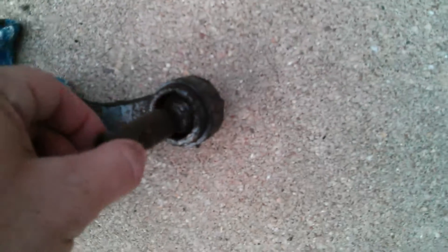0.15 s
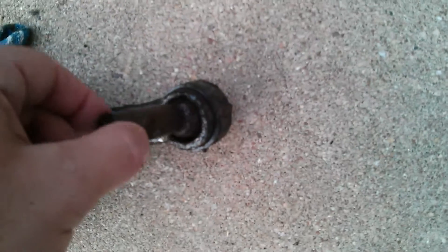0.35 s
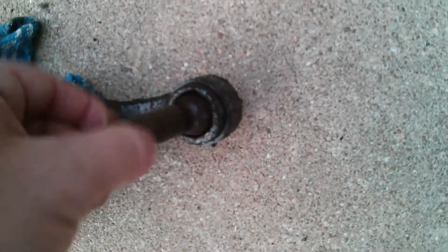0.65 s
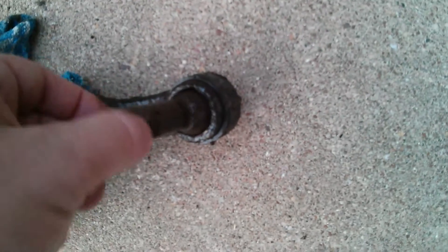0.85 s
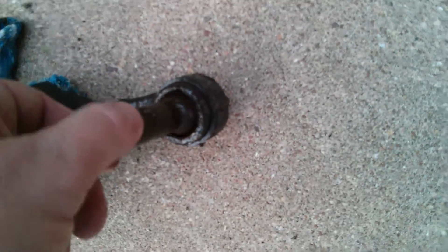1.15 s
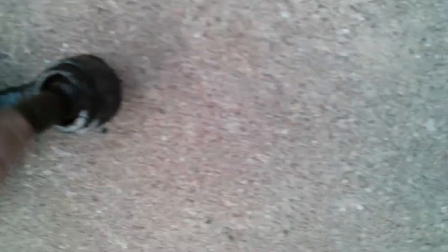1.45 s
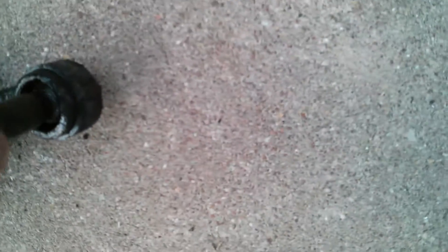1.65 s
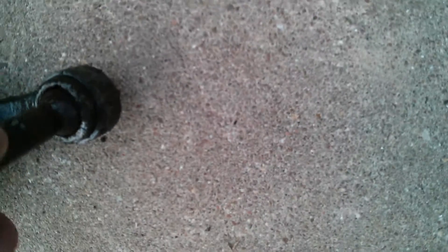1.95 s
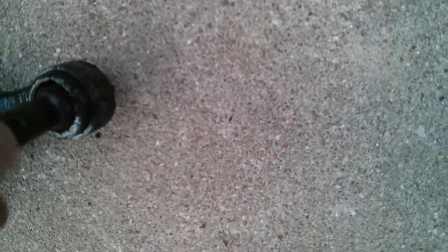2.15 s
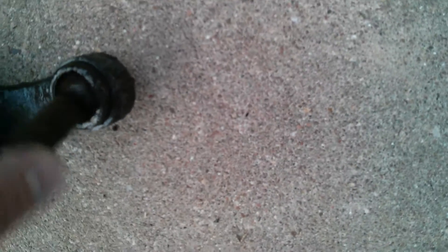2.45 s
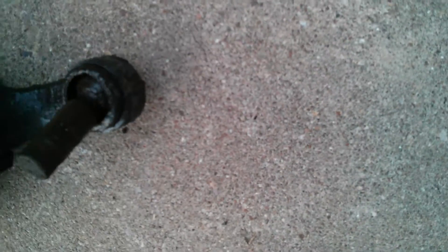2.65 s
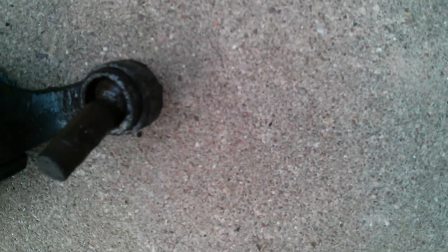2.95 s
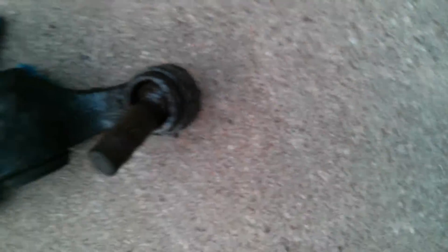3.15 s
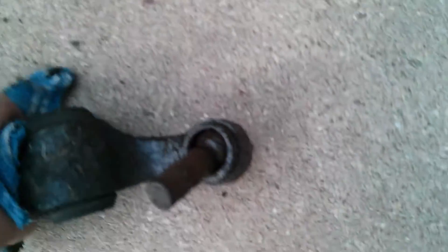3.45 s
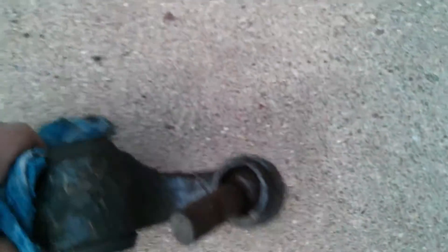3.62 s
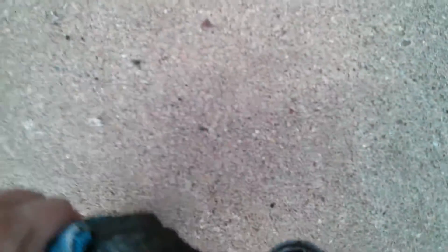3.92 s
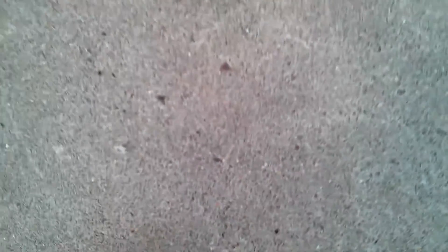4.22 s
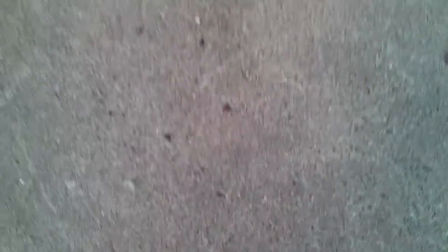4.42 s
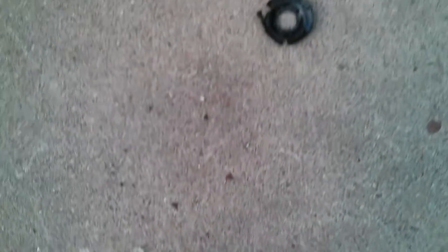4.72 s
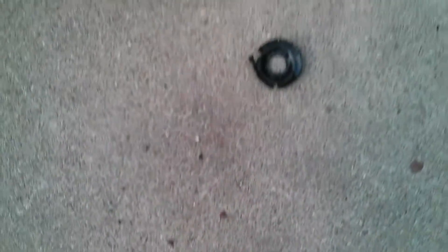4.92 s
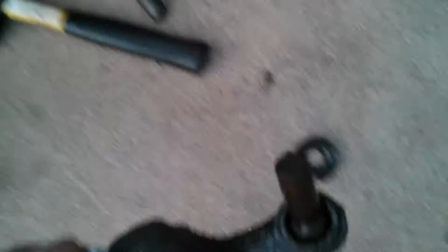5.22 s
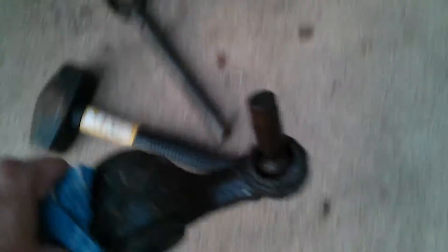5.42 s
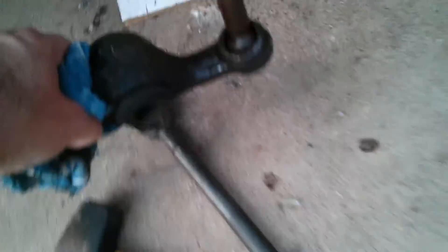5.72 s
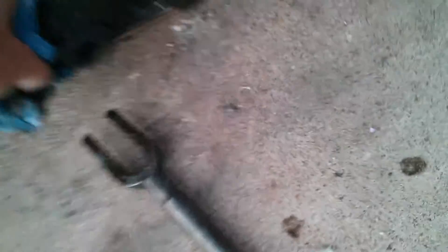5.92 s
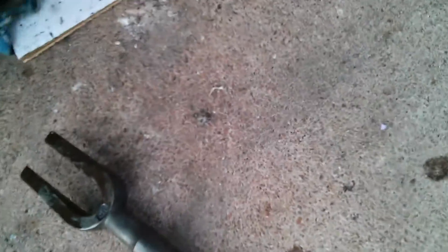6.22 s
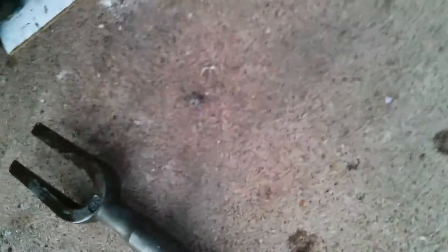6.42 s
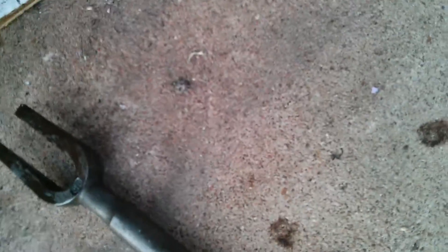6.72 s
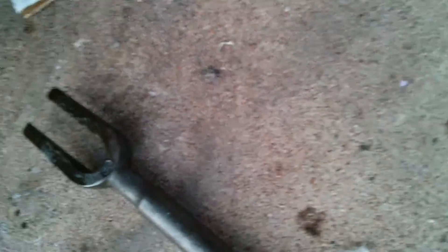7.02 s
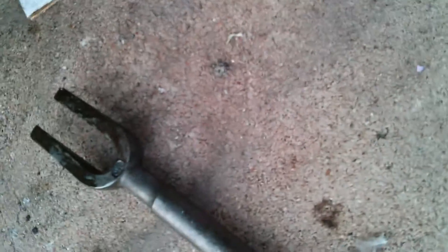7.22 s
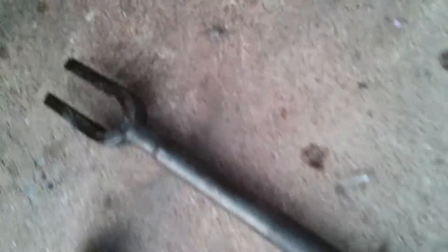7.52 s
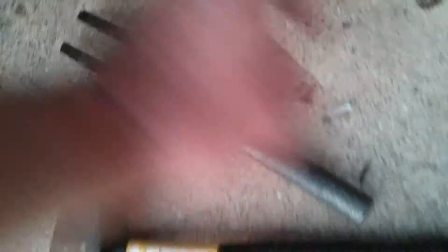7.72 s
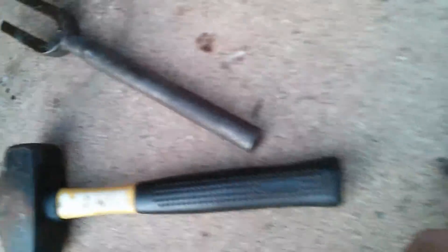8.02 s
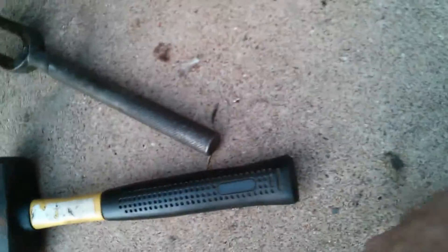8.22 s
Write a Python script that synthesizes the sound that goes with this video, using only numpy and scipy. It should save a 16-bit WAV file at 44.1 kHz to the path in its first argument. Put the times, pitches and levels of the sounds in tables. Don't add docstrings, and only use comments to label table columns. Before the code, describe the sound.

Close, dry clinks of a loose steel stud knocked in its worn socket, with tiny faint squeaks between. After a quiet gap, the iron arm scuffs gritty concrete and brushes a steel fork, which rings briefly. Two clusters of hard clanks follow as it bangs down among tools, then light taps. Distant traffic, thin far tones and leaf hiss run throughout; a bird rasps faintly twice. Handheld microphone, short dull echo.

```python
import sys
import numpy as np
from scipy import signal
from scipy.fft import rfft, irfft, next_fast_len
from scipy.io import wavfile

SR = 44100
rng = np.random.default_rng(int(sys.argv[2]) if len(sys.argv) > 2 else 0)


def decibels_to_gain(level_db):
    exponent = np.asarray(level_db, float) / 20
    return 10 ** exponent


def persist_wave(psi):
    counts = np.round(np.clip(psi, -1, 1) * 32767).astype(np.int16)
    wavfile.write(sys.argv[1], SR, np.atleast_2d(counts).T)


N = 368676
TIME = np.arange(N) / SR


def rms_one(x):
    return x / np.sqrt(np.mean(x ** 2) + 1e-20)


def in_time(rows):
    s, *columns = np.transpose(rows)
    return [np.interp(TIME, s, column) for column in columns]


def band(x, low_hz, high_hz, order=2):
    edges = [low_hz, min(high_hz, .45 * SR)]
    return signal.sosfilt(signal.butter(order, edges, "band", fs=SR, output="sos"), x)


def coloured(x, spectrum):
    hz, level_db = np.transpose(spectrum)
    size = next_fast_len(len(x), True)
    grid_hz = np.arange(1, size // 2 + 2) * SR / size
    gain = decibels_to_gain(np.interp(np.log(grid_hz), np.log(hz), level_db, -90, -90))
    return rms_one(irfft(rfft(x, size) * gain, size)[:len(x)])


def drift(rate_hz, size=N):
    r = np.exp(-80 * np.pi * rate_hz / SR)
    slow = signal.lfilter([1], [1, -2 * r, r * r], rng.standard_normal(size // 40 + 502))[500:]
    slow = (slow - slow.mean()) / slow.std()
    return np.interp(np.arange(size) / 40, np.arange(len(slow)), slow)


def resonances(x, modes):
    out = 0
    for k, (hz, width_hz, level_db) in enumerate(modes):
        r = np.exp(-np.pi * width_hz / SR)
        feed = np.array([1, 0, -1]) * (1 - r * r) / 2
        back = [1, -2 * r * np.cos(2 * np.pi * hz / SR), r * r]
        out = out + (-1) ** k * decibels_to_gain(level_db) * signal.lfilter(feed, back, x)
    return out


def grains(per_s, spread_db):
    sizes = decibels_to_gain(spread_db * np.minimum(rng.exponential(1, N), 4)) * rng.choice([-1, 1], N)
    return rms_one(sizes * (rng.random(N) < per_s / SR) + 1e-9)


def add(out, s, sound):
    i = round(s * SR)
    out[i:i + len(sound)] += sound[:N - i]


def struck(t, hz, level_db, t60, rise):
    return decibels_to_gain(level_db - 60 * t / t60) * (1 - np.exp(-t / rise)) * np.sin(2 * np.pi * hz * t)


def presses(rows, fade_db_s, extra_db=None, lift_db=0):
    out = np.zeros(N)
    for k, (start, length, final_db, swell_db, *_) in enumerate(rows):
        i = int(start * SR)
        t = TIME[:min(SR, N - i)]
        level_db = final_db - swell_db * np.maximum(1 - t / max(length, 1e-3), 0)
        level_db = level_db - fade_db_s * np.maximum(t - length, 0)
        level_db = level_db - lift_db * np.clip((t - length) / 0.0038, 0, 1)
        out[i:i + SR] += np.minimum(t / 0.0064, 1) * decibels_to_gain(level_db + (extra_db[k] if extra_db else 0))
    return out


# (time [s], heavy traffic level [dB], tyre whine level [dB])
ROAD_LEVELS = [(0.0, -51, -50.5), (.46, -50, -49), (1.21, -47.5, -50.5), (1.91, -49, -51.5),
               (2.33, -47.5, -48.5), (3.26, -55.5, -51.5), (4.15, -50.5, -54), (5.42, -58.5, -55),
               (6.03, -57, -57), (6.3, -51, -52.5), (7.03, -52, -59.5), (7.42, -48, -55.5),
               (7.71, -52, -58.5), (8.36, -50.5, -55.5)]
# (frequency [Hz], level [dB])
RUMBLE_SPECTRUM = [(65, -43), (110, -11), (166, 2.5), (275, 0.5), (330, -7), (430, -7.5), (730, -120)]


def road():
    rumble_db, whine_db = in_time(ROAD_LEVELS)
    roar_db = -54 + 0.39 * (rumble_db - rumble_db.mean())
    white = rng.standard_normal((4, N))
    wind = decibels_to_gain(-54 + 2.2 * drift(6.1)) * rms_one(band(white[3], 31, 116))
    rumble = decibels_to_gain(rumble_db + 1.0 + 1.73 * drift(24.0)) * coloured(white[0], RUMBLE_SPECTRUM)
    roar = decibels_to_gain(roar_db + 1.8 * drift(20.0)) * rms_one(band(white[1], 284, 600))
    tyre_modes = [(930, 15.0, 4.5), (810, 113, -5.5), (1032, 110, -2.0), (743, 105, -3.0)]   # Hz, width, dB
    whine = rms_one(resonances(white[2], tyre_modes))
    return wind + rumble + roar + decibels_to_gain(whine_db - 2.14 + 2.7 * drift(5.9)) * whine


# (time [s], hedge level [dB], treetop level [dB])
BREEZE_LEVELS = [(0.0, -47.5, -56), (0.3, -50.5, -54), (2.0, -46, -50), (2.98, -48.5, -54),
                 (3.33, -49.5, -55), (3.91, -47.5, -52), (4.56, -45, -50), (4.84, -48.5, -57.5),
                 (5.1, -46, -55), (5.35, -40.5, -50.5), (6.12, -50.5, -58), (6.36, -46.5, -54),
                 (6.52, -42.5, -50), (6.89, -47.5, -55.5), (7.24, -50, -55), (7.38, -40.5, -50),
                 (7.68, -45, -54.5), (8.36, -49, -60)]
# (frequency [Hz], level [dB])
HEDGE_SPECTRUM = [(2650, -22.5), (4500, -11.5), (4900, -7), (6430, -1.5), (7170, 2.5), (8380, 2.5),
                  (9500, -9.5), (12400, -25), (20900, -120)]
TREETOP_SPECTRUM = [(5590, -19), (9500, -3.5), (10200, -7), (11200, -5.5), (14200, -12), (15900, -10)]
AIR_SPECTRUM = [(900, 1), (1100, 0.5), (1850, -7), (2200, -9), (2700, -18), (3150, -42), (3600, -13),
                (4300, -21), (5000, -44), (6000, -31)]
# (lowest frequency [Hz], highest frequency [Hz])
BUSH_BANDS = [(4000, 5600), (5600, 7000), (7000, 8600), (8600, 10500), (10500, 13500)]


def leaves():
    hedge_db, top_db = in_time(BREEZE_LEVELS)
    tyre_db = in_time(ROAD_LEVELS)[1]
    air_db = -60 + 0.73 * (tyre_db - tyre_db.mean())
    white = rng.standard_normal((3, N))
    hedge = decibels_to_gain(hedge_db - 1) * coloured(white[0], HEDGE_SPECTRUM)
    hiss = hedge + decibels_to_gain(top_db + 3) * coloured(white[1], TREETOP_SPECTRUM)
    for low_hz, high_hz in BUSH_BANDS:
        hiss = hiss + (decibels_to_gain(1.5 * drift(4.5)) - 1) * band(hiss, low_hz, high_hz)
    gusts = decibels_to_gain(-1.32 + 0.97 * drift(12) + 1.6 * drift(0.43))
    return gusts * hiss + decibels_to_gain(air_db + 1.6 * drift(4.3)) * coloured(white[2], AIR_SPECTRUM)


# (start time [s], end time [s], start frequency [Hz], end frequency [Hz], level [dB])
FAR_TONES = [(0.255, 0.758, 927, 930, -55.5), (0.691, 0.911, 242, 264, -47.5), (0.86, 1.054, 326, 553, -48),
             (1.026, 1.146, 372, 350, -52.5), (1.05, 1.674, 461, 456.4, -53.5),
             (1.252, 1.6, 252.3, 250, -53.5), (2.101, 2.65, 920, 957, -56.5),
             (2.697, 3.15, 930, 930, -60.5), (4.101, 4.26, 532, 507, -57.5),
             (4.207, 4.368, 412.5, 403, -51.5), (4.589, 4.79, 326, 328, -57),
             (4.948, 5.655, 973, 1028, -62), (7.716, 8.402, 356, 353.5, -56),
             (7.721, 8.396, 418, 427, -55.5), (7.9, 8.403, 197, 168.7, -55), (0, 0.142, 3570, 3750, -63),
             (0.315, .41, 3700, 3720, -63), (1.277, 1.468, 3720, 3720, -73)]


def drones():
    out, t = np.zeros(N), TIME[:SR]
    for start, end, from_hz, to_hz, db in FAR_TONES:
        hz = np.interp(t, [0, end - start], [from_hz, to_hz]) * (1 + 0.0059 * drift(8.9, size=SR))
        swell = np.clip(np.minimum(t, end - start - t) / 0.032, 0, 1)
        waver = 0.33 + drift(8 + to_hz / 60, size=SR)
        add(out, start, swell * decibels_to_gain(db + 6.5) * waver * np.sin(2 * np.pi * np.cumsum(hz) / SR))
    return out


# (start time [s], length [s], level [dB])
BIRD_CALLS = [
    (6.57, .16, -50),
    (8.07, .26, -52),
]
# (frequency [Hz], level [dB])
BIRD_LINES = [(3560, -6), (3740, -6), (4020, 0), (4360, -4), (4710, -3), (5120, -5), (5450, -5), (5670, -2),
              (5890, -6)]


def bird():
    out, t = np.zeros(N), TIME[:SR // 3]
    from_hz, to_hz, width_hz = 5700, 4050, 620
    for start, length, db in BIRD_CALLS:
        slide = 1 / (1 + np.exp((t / length - .38) / .07))
        stress_hz = to_hz + (from_hz - to_hz) * slide
        swell = np.clip(np.minimum(t, length + .02 - t) / 0.045, 0, 1)
        swell = swell * decibels_to_gain(db + 2.5 * drift(33, size=len(t)))
        breath = rms_one(band(rng.standard_normal((len(BIRD_LINES), len(t))), 6, 60))
        for (hz, line_db), noise in zip(BIRD_LINES, breath):
            stress = np.exp(-((hz - stress_hz) / width_hz) ** 2)
            add(out, start, swell * decibels_to_gain(line_db) * stress * noise * np.sin(2 * np.pi * hz * t))
    return out


def walls(x):
    t = TIME[:SR // 3]
    fade = decibels_to_gain(-47 - 60 * t / 0.41) * (t > .006)
    response = fade * rng.standard_normal(len(t))
    return signal.fftconvolve(band(x, 280, 10600, order=1), response)[:N]


# (time [s], peak level [dB], low modes level [dB])
TOOL_TAPS = [
    (6.536, -13, -9),
    (6.549, -2, -20),
]
# (frequency [Hz], level [dB], time to fall 60 dB [s])
TOOL_MODES = [(1810, -7, 0.054), (2480, -17, 0.12), (3050, -22, 0.088), (4500, -34, 0.07),
              (5120, -43, 0.31), (5660, -2.5, 0.03), (6200, -10, 0.03), (6360, -16, 0.025),
              (7483, -34, 5.0)]


def small_tool():
    out, t = np.zeros(N), TIME[:SR // 8]
    rattle = band(rng.standard_normal((len(TOOL_TAPS), len(t))) * decibels_to_gain(-60 * t / 0.1), 1400, 4600)
    for (s, peak_db, low_db), noise in zip(TOOL_TAPS, rattle):
        add(out, s, decibels_to_gain(peak_db - 22) * noise)
        for hz, db, t60 in TOOL_MODES:
            favour_db = (low_db + 10.5 + 5 * (hz > 2000)) * (hz < 3500)
            add(out, s, struck(t, hz, peak_db + db - 7.0 + favour_db, min(t60, .045), 0.00057))
    return out


# (start time [s], length [s], final level [dB], swell [dB])
FORK_GRAZES = [
    (5.672, 0.025, -19, 0),
    (5.695, 0.017, -3.5, 9),
    (5.71, 0.023, -7, -4),
    (5.731, 0.0086, -15, -7),
]
# (first level [dB], second level [dB], third level [dB], fourth level [dB])
GRAZE_REACH = [(-20, -12, -14, -27), (-18.5, -12, -2.5, -12), (-20, -4.5, -12, -23), (-22, -11, -6, -18)]
# (frequency [Hz], level [dB])
FORK_MODES = [
    [(3022, 2)],
    [(5305, -1.5), (5413, -14), (4655, -16.5), (14120, -14)],
    [(5976, -2), (6126, -14), (6464, -17), (6840, -20)],
    [(9850, -2), (11100, -5), (9100, -9), (13000, -11)],
]


def fork():
    out, start = np.zeros(N), round(FORK_GRAZES[0][0] * SR)
    span, size = slice(start, start + SR // 4), SR // 4
    for modes, reach_db in zip(FORK_MODES, zip(*GRAZE_REACH)):
        rubbing = presses(FORK_GRAZES, 620, reach_db, 13)
        tail = decibels_to_gain(-38) * presses(FORK_GRAZES, 520, reach_db)
        drive = rubbing + tail
        for hz, db in modes:
            ring = np.sin(2 * np.pi * hz * TIME[span] + 1.1 * drift(70, size=size))
            out[span] += drive[span] * decibels_to_gain(db + 1.5 + 1.6 * drift(140, size=size)) * ring
    return out


# (start time [s], length [s], frequency [Hz], level [dB]); close pairs beat
STUD_SPOTS = [(0.2776, 0.0067, 2430, -8.5), (0.278, 0.0071, 2640, -18), (0.2772, .003, 12400, -32),
              (0.277, .001, 5070, -32.5), (0.28, 0.0015, 7530, -17), (0.281, .008, 3500, -43),
              (0.3022, 0.001, 7870, -19.5), (0.303, 0.013, 3690, -34), (0.313, 0.011, 4050, -41),
              (0.31, 0.0082, 3030, -41), (1.546, .002, 7800, -32), (1.5466, .008, 2467, -22.5),
              (1.5468, .008, 2645, -22.5), (2.4, 0.0036, 5800, -47), (2.4395, 0.0022, 4470, -18.5),
              (2.44, 0.0048, 4060, -21.5), (2.447, 0.012, 6250, -41), (2.581, .002, 12600, -38),
              (2.438, 0.0053, 3130, -25), (2.57, 0.014, 5670, -44), (2.571, 0.0065, 3200, -42),
              (2.564, 0.029, 1820, -45)]
# (start time [s], length [s], frequency [Hz], level [dB])
ARM_SPOTS = [(5.128, .05, 1940, -50), (5.208, 0.016, 2940, -40), (5.343, .02, 1936, -39),
             (5.6715, 0.0018, 5260, -24), (6.349, 0.011, 4920, -13.5), (6.35, 0.0088, 5850, -12),
             (6.351, .007, 8540, -19), (6.351, .01, 3770, -22), (6.385, .006, 7910, -27),
             (6.384, .006, 10800, -24), (6.386, .012, 12600, -27), (6.407, 0.014, 6200, -26),
             (6.422, 0.0068, 6200, -26), (6.407, .014, 5050, -32), (6.408, 0.0096, 3680, -24),
             (6.421, .005, 3500, -25), (6.409, 0.006, 2410, -24), (6.45, .006, 6600, -22),
             (6.453, 0.012, 3980, -30), (6.541, 0.0057, 3300, -33), (6.558, 0.0093, 2540, -30),
             (6.555, .008, 4450, -41), (7.207, 0.0064, 1016, -22.5), (7.216, .01, 5660, -24),
             (7.24, 0.024, 1210, -19), (7.241, 0.022, 800, -20), (7.245, 0.018, 388, -25),
             (7.24, 0.069, 106, -29), (7.24, 0.045, 183, -28), (7.253, 0.0064, 7160, -15),
             (7.255, .01, 4370, -21), (7.253, .008, 6200, -19), (7.284, 0.008, 4590, -31),
             (7.288, .003, 5700, -22), (7.305, 0.025, 3630, -35), (7.31, .02, 5720, -43),
             (7.389, .003, 6740, -28), (7.391, 0.009, 4760, -23), (7.391, 0.014, 3030, -25),
             (7.395, 0.0027, 1370, -21), (7.312, .02, 1110, -33), (7.398, 0.0065, 2390, -31),
             (7.555, 0.0071, 2230, -46.5), (7.883, 0.0044, 2070, -59), (7.953, 0.002, 7700, -27)]


def rings():
    out, t = np.zeros(N), TIME[:SR // 10]
    sag_db_s, fade_db_s, rise_s = 250, 2597, 0.0008
    for start, length, hz, db in STUD_SPOTS + ARM_SPOTS:
        loss_db = sag_db_s * t + fade_db_s * np.maximum(t - length, 0)
        wobble_db = 1.4 * drift(100, size=len(t))
        level = decibels_to_gain(db - loss_db + wobble_db) * (1 - np.exp(-t / rise_s))
        add(out, start, level * np.sin(2 * np.pi * hz * t))
    return out


# (time [s], frequency [Hz], level [dB])
EDGE_SNAPS = [(5.171, 7600, -26), (5.184, 7000, -27), (5.2005, 7500, -18), (5.3538, 5870, -10),
              (5.6722, 830, -29), (5.8119, 663, -22.5), (5.817, 900, -27), (6.3556, 5440, -9),
              (6.4476, 6660, -3), (6.4518, 5900, -4), (6.5495, 6400, -14), (7.2125, 11300, -2),
              (7.218, 5600, -6), (7.2545, 6500, -1), (7.3898, 6500, -4)]


def snaps():
    out, t = np.zeros(N), TIME[:SR // 20]
    for s, hz, db in EDGE_SNAPS:
        add(out, s, struck(t, hz, db + 3.0, 16.0 / hz, 0.00012))
    return out


# (time [s], peak level [dB], top level [dB], thud level [dB])
SHARP_BLOWS = [(1.326, -53.5, -48, -59), (1.638, -74, -42, -43), (2.287, -61, -30, -42),
               (2.4385, -43, -29.5, -50), (5.354, -13, -32, -43), (5.473, -23, -32, -47),
               (5.6733, -15, -28, -18), (5.812, -22, -43, -19), (6.349, 2, 5.5, -12), (6.3547, 4, -3, -13),
               (6.3847, -23, -12, -22), (6.406, -9, -26, -39), (6.43, -26, -26, -40),
               (6.4346, -18, -11, -27), (6.443, -32, -18, -40), (6.448, -22, -10, -31),
               (6.4517, -11, -6, -30), (7.196, -15, -33, -19.5), (7.2032, -35, -20, -32),
               (7.208, -13, -11, -18), (7.2123, -20, -6, -39), (7.2176, -3, -14, -42),
               (7.2243, -24, -16, -42), (7.229, -22, -22, -44), (7.2377, -7, -31, -18),
               (7.25, -20, -19, -30), (7.252, -14, -2, -15), (7.262, -8, -5, -23), (7.306, -26, -15, -33),
               (7.3136, -18, -11.5, -21), (7.3826, -32, -12, -23), (7.3915, 2.5, -35, -19.5),
               (7.5564, -19.5, -37, -45), (7.639, -26, -36, -45), (7.886, -26.5, -30.5, -46),
               (7.954, -37, -35, -49)]
# (frequency [Hz], width [Hz], level [dB])
ARM_MODES = [(348, 21, -2), (800, 164, 5), (1130, 380, -1), (1635, 250, 4.5), (2160, 410, -4.5),
             (2650, 26, -37), (3040, 31, -39), (3220, 76, -1), (3980, 99, -24), (3900, 100, -22)]


def blows():
    out, t = np.zeros(N), TIME[:SR // 8]
    white = rng.standard_normal((len(SHARP_BLOWS), 3, len(t)))
    crack = 9.1 * (np.arange(len(t)) == 4)
    rise = 1 - np.exp(-t / 0.0006)
    for (s, peak_db, top_db, thud_db), noise in zip(SHARP_BLOWS, white):
        spray = noise[0] * rise * decibels_to_gain(-60 * t / 0.06) + crack
        top = noise[1] * rise * decibels_to_gain(-60 * t / 0.025) + crack
        thud = resonances(noise[2] * decibels_to_gain(-60 * t / 0.04), ARM_MODES)
        thud = thud + decibels_to_gain(-9.0) * noise[2] * decibels_to_gain(-60 * t / 0.01) + decibels_to_gain(-2.5) * crack
        add(out, s, decibels_to_gain(peak_db - 12.5) * band(spray, 3160, 7800))
        add(out, s, decibels_to_gain(top_db - 2.5) * band(top, 9400, 17750))
        add(out, s, decibels_to_gain(thud_db + 7.5) * band(thud, 300, 1940))
    return out


# (start time [s], length [s], final level [dB], swell [dB])
GRIT_DRAGS = [(5.11, 0.073, -34.5, 12), (5.19, 0.033, -32, 11), (5.337, 0.014, -30, 6),
              (5.365, 0.15, -53, -13), (5.471, 0.013, -28.5, -4), (5.671, 0.025, -27, 17),
              (5.698, 0.035, -18.5, 1), (5.8, 0.3, -61.5, -20), (5.801, 0.008, -30, 0),
              (6.343, 0.0091, -8.5, 32), (6.37, 0.035, -32, 14), (6.405, 0.045, -21.5, 15),
              (6.452, 0.0049, -42, -16), (7.196, 0.02, -18.5, 24), (7.222, 0.014, -29, -5),
              (7.24, 0.016, -10, 28), (7.303, 0.023, -23.5, 2.5), (7.335, 0.045, -42, 3),
              (7.388, 0.0041, -17.5, -7), (7.425, 0.13, -54, -6)]
# (start time [s], length [s], final level [dB], swell [dB], clang over thud [dB])
ARM_LOADS = [(5.117, 0.11, -44, 12.5, 0.5), (5.335, 0.017, -42.5, 7, 7), (5.664, 0.042, -30, 1, -13),
             (5.685, 0.036, -39, 23, 11), (5.796, 0.0096, -22.5, 28, -12), (5.803, 0.048, -72, -17, 0),
             (6.341, 0.055, -21.5, 4, -7), (6.396, 0.052, -28.5, 4, -3), (7.192, 0.051, -23, 7, -4.5),
             (7.238, 0.021, -12.5, 2, -7), (7.308, 0.056, -34.5, -12.5, -6.5), (7.384, 0.0039, -40, 9, 20),
             (7.455, 0.24, -51, -1, -8.5)]
# (frequency [Hz], level [dB per Hz])
SCUFF_SPECTRUM = [(2350, -43), (4000, -17), (4670, -1), (7930, 2.5), (14900, -12), (15800, -5)]
GRIT_SPECTRUM = [(2350, -59), (4000, -6.5), (6050, 1.5), (6630, -1.5), (8060, 1.5), (9260, -4.5),
                 (13500, -7), (15800, -10.5)]


def drags():
    grit = grains(11000, 4.6) * decibels_to_gain(0.83 * drift(140))
    body = resonances(grit, ARM_MODES) + decibels_to_gain(-5.5) * grit
    crunch = np.where(TIME < 5.6, coloured(grit, SCUFF_SPECTRUM), coloured(grit, GRIT_SPECTRUM))
    hiss = presses(GRIT_DRAGS, 798) * crunch
    clang_db = [row[-1] for row in ARM_LOADS]
    clang = presses(ARM_LOADS, 521, clang_db) * rms_one(band(body, 1010, 5450))
    thud = presses(ARM_LOADS, 521) * rms_one(band(body, 180, 1400))
    return decibels_to_gain(0.3) * hiss + clang + decibels_to_gain(-5.0) * thud


# (start time [s], length [s], high squeak level [dB], low squeak level [dB])
BALL_SLIPS = [(0.608, .03, -62, -58), (0.672, 0.026, -54, -59), (0.712, .025, -56, -66),
              (0.802, 0.044, -60, -61), (0.94, 0.033, -56, -54.5), (0.998, .01, -65, -62),
              (1.047, 0.025, -58, -64.5), (1.093, 0.087, -61, -61), (1.322, 0.007, -61, -64),
              (1.38, .012, -63, -51), (1.703, 0.044, -60, -53)]
# (frequency [Hz], width [Hz], level [dB])
BALL_MODES = [
    [(12400, 100, 6), (12800, 240, -11), (13600, 270, -10)],
    [(7780, 150, -3), (8800, 220, -8)],
]


def squeak():
    slips = grains(1200, 2.1) * decibels_to_gain(2.2 * drift(50))
    runs = [(start, length, 0, 3.0) for start, length, *_ in BALL_SLIPS]
    out = np.zeros(N)
    for modes, level_db in zip(BALL_MODES, list(zip(*BALL_SLIPS))[2:]):
        out += decibels_to_gain(9.0) * presses(runs, 700, level_db) * rms_one(resonances(slips, modes))
    return out


# (time [s], square ring level [dB], glancing crack level [dB],
# arm ring level [dB], tip ring level [dB])
STUD_KNOCKS = [(0.135, -39, -61, -36, -37), (0.2773, -43, -22, -32.5, -22), (0.302, -38, -28, -40, -31.5),
               (0.311, -41, -31, -56, -34), (0.573, -38, -67, -48, -49), (1.074, -48.5, -54.5, -53.5, -57),
               (1.548, -22, -38, -47, -39), (2.0095, -55, -62, -63, -28), (2.2423, -52, -64, -55, -45),
               (2.4051, -19.5, -27, -36, -34.5), (2.423, -29, -36, -48, -38),
               (2.4374, -38, -20.5, -35, -34), (2.4677, -57, -57, -50, -38), (2.545, -56, -54, -41, -39),
               (2.573, -42, -38, -41.5, -36)]
# (frequency [Hz], level [dB], time to fall 60 dB [s])
STUD_MODES = [
    [(2490, 16.5, 0.019), (2623, -0.5, 0.076), (2190, -19, 0.054), (2730, -25, .04)],
    [(1370, 5, 0.065), (1680, -1.5, 0.061)],
    [(3470, -10, 0.045), (3720, -15, 0.035), (4000, -21.5, 0.0083), (4560, -19, 0.018)],
    [(6500, -24, .037), (7500, 4, 0.017), (7870, 3.5, 0.026), (12380, 6, 0.012)],
]


def stud():
    out, t = np.zeros(N), TIME[:SR // 4]
    detune = 1 + 0.005 * rng.standard_normal((len(STUD_KNOCKS), len(STUD_MODES), 4))
    free_ring_s = 0.02
    settle = 1 / (1 + np.exp(np.clip((t - free_ring_s) / 0.0011, -50, 50)))
    choke = decibels_to_gain(-28.0) + (1 - decibels_to_gain(-6.0)) * settle
    noise = rng.standard_normal((len(STUD_KNOCKS), len(t))) * decibels_to_gain(-60 * t / 0.076)
    rattles = band(noise, 1300, 5330, order=3)
    for (s, main_db, crack_db, low_db, bright_db), shifts, rattle in zip(STUD_KNOCKS, detune, rattles):
        ring = 0
        family_levels = (main_db, low_db, crack_db - 1, bright_db)
        for modes, family_db, shift in zip(STUD_MODES, family_levels, shifts):
            for (hz, db, t60), d in zip(modes, shift):
                ring = ring + struck(t, hz * d, db + family_db, t60, 0.0031)
        hum = struck(t, 2500, main_db - 28.0, 0.14, 0.0033) * decibels_to_gain(5.0 * drift(60, size=len(t)))
        add(out, s, hum + decibels_to_gain(6.5) * ring * choke + decibels_to_gain(crack_db + 1.5) * rattle)
    return out


def scene():
    background = road() + leaves() + drones() + bird()
    ringing = fork() + rings()
    knocks = small_tool() + snaps() + blows() + drags() + squeak() + stud()
    echo = walls(knocks + decibels_to_gain(-7) * ringing)
    return (background + echo + ringing + knocks)[None]


def band_limit(x):
    return signal.sosfilt(signal.butter(12, 16800, fs=SR, output="sos"), x)


def record(dry):
    rounded = .6 * np.tanh(dry / .6)
    mix = signal.sosfilt(signal.cheby2(10, 45, 16200, fs=SR, output="sos"), rounded)
    return band_limit(mix)


dry = scene()
out = record(dry)
persist_wave(out)
```